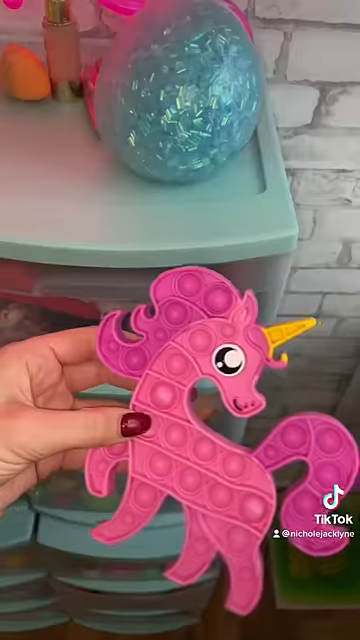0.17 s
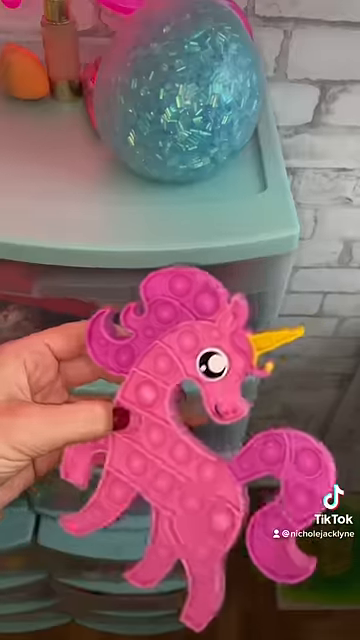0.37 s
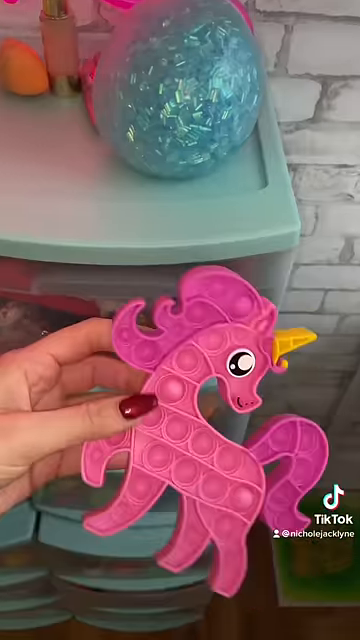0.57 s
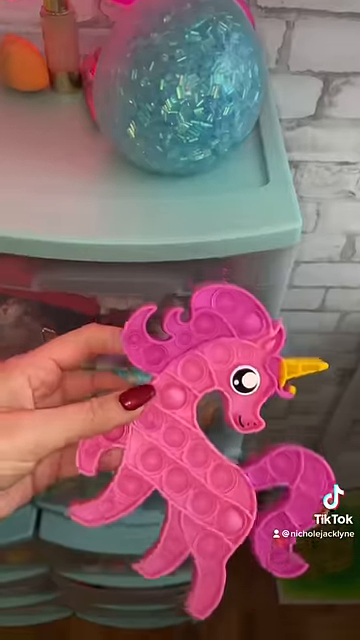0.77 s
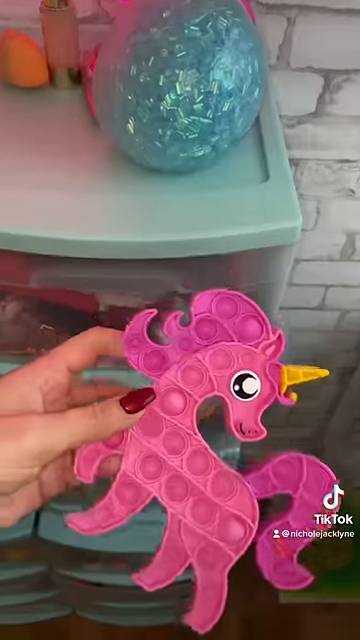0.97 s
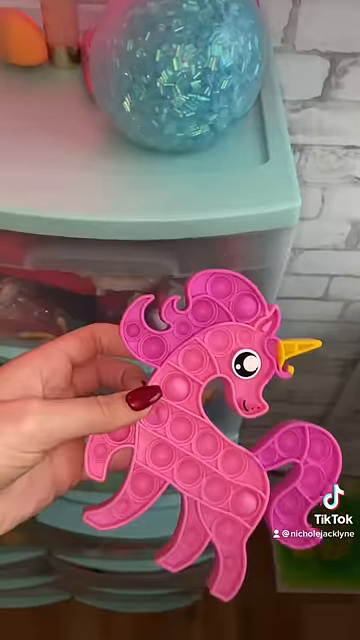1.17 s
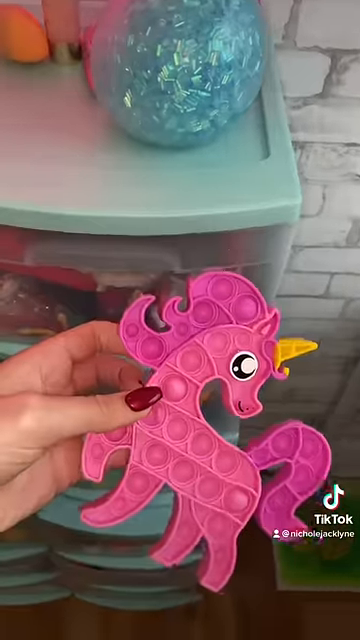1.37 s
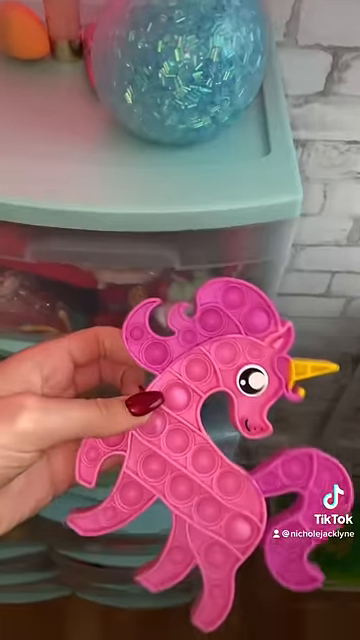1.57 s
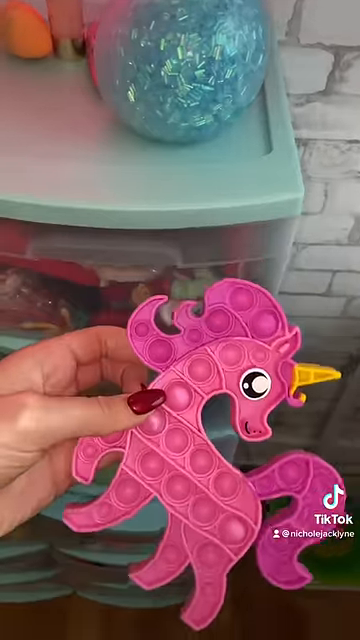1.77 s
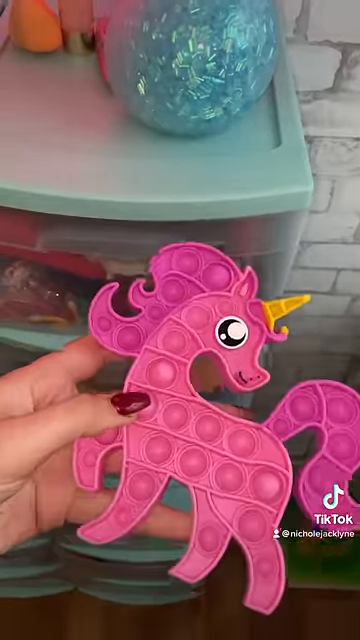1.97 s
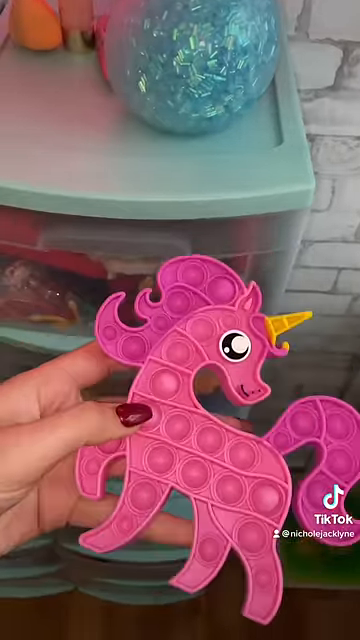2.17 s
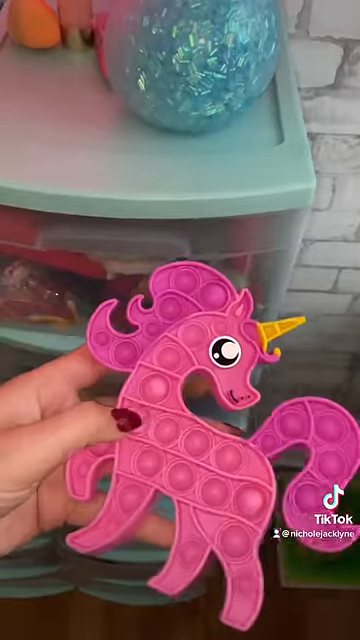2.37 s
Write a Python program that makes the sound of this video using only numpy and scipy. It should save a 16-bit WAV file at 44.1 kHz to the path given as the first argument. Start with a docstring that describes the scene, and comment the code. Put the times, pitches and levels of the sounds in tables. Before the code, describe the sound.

A silicone fidget toy pops three times, first sharply, then more softly, over a low drone.

```python
"""A low drone, then a sharp pop right at the microphone: a hand presses three bubbles of a silicone
fidget toy in a small, live room. Each dome snaps through and rings briefly, the last two more softly.
A brief high hiss swells just before the first two pops; between pops, fingers rub and tick on the rubber.
Farther off, under the room's air and faint hum, is what may be a distant vehicle.
The sound cuts out briefly three times."""
import sys
import numpy as np
from scipy import signal
from scipy.fft import rfft, irfft
from scipy.io import wavfile
from scipy.ndimage import uniform_filter1d

SR = 44100
rng = np.random.default_rng(int(sys.argv[2]) if len(sys.argv) > 2 else 0)


def transcribe(u):
    """Save the signal u as a 16-bit wav file named by the first command-line argument.

    u: samples, shape (n,) or (channels, n), limited to [-1, 1]; the rate is SR.
    q: integer samples, one column per channel.
    """
    v = np.clip(np.atleast_2d(u).T, -1, 1)
    q = np.round(v * 32767).astype(np.int16)
    wavfile.write(sys.argv[1], SR, q)


N = 106060

# pops at the microphone: t/s, gain/dB, pitch ratio, body low-pass/Hz, snap gain/dB,
# back-wave delay/ms, back-wave share, crack level/dB, room send/dB
POPS = [(.2463, -2, 1.05, 3550, 3.5, 1.19, 0.36, -33, -1),
        (1.6544, -13, 1.13, 3260, 3.5, 1.303, 0.64, -52, -1.5),
        (2.2671, -15.5, 1.02, 1760, -4, 1.35, 0.47, -61, 1)]
# modes of a dome, the low ones its body, the high ones its snap: f/Hz, gain/dB, t60/s
DOME_MODES = [(651, -3, 0.0054), (1019, 7, 0.0043), (1691, -17, .008), (2614, -24, 0.0091),
              (3052, -17.5, 0.007), (3350, -30, 0.0041)]
# spectrum of the crack: f/Hz, relative level/dB
CRACK_COLOUR = [(2500, -31), (4300, -18.5), (5300, 2), (6300, 5.5), (7300, -4), (9000, -16), (11500, -15),
                (13500, -34), (16000, -35.5)]
# skin and nail ticking on rubber: t/s, level/dB, centre f/Hz, width/octaves, decay/s
TICKS = [(0.1439, -50, 2700, 0.18, 0.001), (0.433, -63, 7850, 0.27, .003), (.584, -60, 3300, .4, .002),
         (.660, -54.5, 6510, 0.18, 0.0016), (0.6597, -54.5, 1890, 0.42, 0.0026),
         (0.7609, -57.5, 3330, 0.25, 0.0018), (0.76, -52, 1290, 0.31, .002), (1.219, -64, 2990, .7, .002),
         (1.290, -50, 602, 0.15, 0.0061), (1.288, -68, 8620, 0.13, .004),
         (1.351, -54.5, 709.8, 0.33, 0.0056), (1.462, -66, 2500, 1, 0.0013)]
# a brief high hiss just before the first two pops (the 9500 Hz rows), and finger rubs (the rest):
# middle t/s, half length/s, level/dB, centre f/Hz, width/octaves
RUBS_AND_HISS = [(0.06, 0.065, -71, 5560, 0.91), (0.229, 0.042, -65.5, 7500, 0.45),
                 (0.243, 0.01, -56.5, 2360, 1), (0.243, 0.0047, -57.5, 6300, 0.081),
                 (0.242, 0.0019, -58.5, 9500, 0.34), (0.503, 0.051, -76.5, 7740, 0.71),
                 (0.629, 0.037, -70.5, 7750, 0.58), (0.883, 0.032, -69.5, 4800, .8),
                 (1.6525, 0.0022, -58.5, 9500, 0.36), (1.915, 0.027, -73.5, 3200, 0.33),
                 (1.953, 0.023, -71, 7500, .3), (2.2, 0.2, -77.5, 5670, 0.092)]
# decay of the room's tail: f/Hz, t60/s
ROOM_T60 = [(200, 0.73), (600, 0.66), (1200, 0.8356), (2500, 0.54), (5000, 0.98), (12000, 0.1)]
# spectrum at the start of that tail: f/Hz, relative level/dB
ROOM_COLOUR = [(150, 9.5), (450, 3), (800, 2), (1200, -2), (1900, 7), (3000, 1.5), (4000, -3), (6000, 2),
               (12000, -2.5)]
# reflections off nearby surfaces: delay/s, gain/dB
ECHOES = [(.0047, -28), (.0073, -15), (.0096, -20.5)]
# distant vehicle: t/s, engine note f/Hz, note level/dB, roar level/dB, roar centre f/Hz
VEHICLE = [(0, 270, -82, -64.5, 400.2), (.45, 280, -79.5, -74, 330.7), (.56, 292, -63.5, -61, 350),
           (.78, 312, -65, -60, 390), (.95, 325, -64.5, -58.5, 441.7), (1.08, 335, -64.5, -61, 450),
           (1.2, 268, -70.5, -70, 421.4), (1.35, 265, -67.5, -61.5, 380), (1.55, 264, -67.5, -73.5, 327.8),
           (1.93, 266, -68, -63.5, 310), (2.1, 265, -80, -71, 310), (2.4, 265, -76.5, -73, 307.7)]
# swells of the low drone: t/s, level/dB
DRONE_SWELLS = [(0, -49), (.04, -48), (.15, -50), (.3, -59.5), (.39, -62), (.5, -46.5), (.63, -55),
                (.73, -57), (.82, -44.5), (.93, -59), (1.05, -54), (1.22, -56), (1.36, -49), (1.55, -66),
                (1.69, -49), (1.95, -57), (2.18, -59.5), (2.32, -49.5), (2.4, -54.5)]
# still air of the room: f/Hz, relative level/dB
AIR_COLOUR = [(10, -28.5), (22, -16), (40, 1.5), (65, 0), (100, 3), (140, -7.5), (213, -12), (266, -13.5),
              (478, -18.5), (750, -19), (1200, -24.5), (1770, -26.5), (2840, -28), (4550, -32), (5690, -33),
              (8400, -36.5), (12000, -39.5), (15500, -53)]
# tones of the hum and whine: f/Hz, level/dB
HUM_TONES = [(175.8, -70), (425, -71), (8979, -89), (10977, -94), (11972, -94), (12968, -96)]
# brief near-silences: start t/s, end t/s
DROPOUTS = [(.0685, .1378), (1.1015, 1.1897), (1.9683, 2.0607)]

DOME_RISE_S, CRACK_DECAY_S, CRACK_LEAD_S = .001, .0009, .0007
DOME_BOTTOM_HZ, SNAP_FROM_HZ, SNAP_TOP_HZ = 239, 2200, 4050
ROOM_DB, ROOM_DELAY_S = -12, .003
NOTE_WIDTH_HZ, ROAR_WIDTH_HZ, ROAR_TOP_HZ = 14, 280, 641
DRONE_HZ, DRONE_WANDER = 64.8, .021
AIR_DB, AIR_FLICKER_DB = -56.5, 1.7


def pops():
    """Close up, each dome flips with a tiny crack and rings. Gives the direct sound and the room send."""
    near, sent, t = np.zeros(N), np.zeros(N), np.arange(2048) / SR
    rise = 1 - np.exp(-t / DOME_RISE_S)
    for s, db, pitch, top_hz, snap_db, back_ms, back_share, crack_db, send_db in POPS:
        modes = []
        for hz, mode_db, t60 in DOME_MODES:
            envelope = rise * amp(db + mode_db - 60 * t / t60)
            modes.append((hz, envelope * np.sin(2 * np.pi * hz * pitch * t)))
        # a gentler press has a duller body
        body = cut(sum(m for hz, m in modes if hz < SNAP_FROM_HZ), top_hz, "low", order=6)
        snap = cut(sum(m for hz, m in modes if hz >= SNAP_FROM_HZ), SNAP_TOP_HZ, "low", order=8)
        ring = cut(body + amp(snap_db) * snap, DOME_BOTTOM_HZ, "high", order=1)
        burst = noise(lambda f: amp(read(CRACK_COLOUR, f)), len(t))
        crack = amp(crack_db) * np.exp(-t / CRACK_DECAY_S) * burst
        add(near, s - CRACK_LEAD_S, crack)
        add(near, s, ring)
        # the dome's back face sends the opposite wave, which returns off the furniture behind
        add(near, s + back_ms / 1000, -back_share * ring)
        add(sent, s, amp(send_db) * (ring + crack))
    return near, sent


def fingers_and_hiss(grain_db=2.5):
    """Close up, fingers tick and rub on silicone; a high hiss swells just before the first two pops."""
    out, t = np.zeros(N), np.arange(N) / SR
    tick_t = t[:2048]
    for s, db, hz, octaves, decay in TICKS:
        add(out, s, amp(db) * np.exp(-tick_t / decay) * band(hz, octaves, len(tick_t)))
    grain = unit(amp(grain_db * drift(hz=200)))
    for s, half_length, db, hz, octaves in RUBS_AND_HISS:
        swell = amp(db) * np.exp(-.5 * ((t - s) / half_length) ** 2)
        out += swell * grain * band(hz, octaves, N)
    return out


def room(x):
    """The small room answers with near reflections and a diffuse tail whose top treble dies first."""
    hz, t, spectrum = signal.stft(rng.standard_normal(SR), SR, nperseg=256)
    tail_db = read(ROOM_COLOUR, hz)[:, None] - 60 * t / read(ROOM_T60, hz)[:, None]
    tail = signal.istft(spectrum * amp(tail_db), SR, nperseg=256)[1]
    response = np.zeros(SR)
    add(response, ROOM_DELAY_S, amp(ROOM_DB) * tail / np.linalg.norm(tail))
    for s, db in ECHOES:
        add(response, s, amp([db]))
    return signal.fftconvolve(x, response)[:N]


def vehicle():
    """Far off, a muffled engine note and roar climb, drop back and fade."""
    note_hz, note_db, roar_db, roar_hz = curves(VEHICLE)
    roar = cut(noise_around(roar_hz, ROAR_WIDTH_HZ), ROAR_TOP_HZ, "low", order=6)
    note = noise_around(note_hz, NOTE_WIDTH_HZ)
    return amp(note_db) * note + amp(roar_db) * unit(roar)


def drone():
    """Underneath, one low tone swells and sinks, wandering a little in pitch."""
    level_db, = curves(DRONE_SWELLS)
    hz = DRONE_HZ * (1 + DRONE_WANDER * drift(hz=5))
    return amp(level_db) * unit(np.sin(phase(hz)))


def air():
    """Room tone all around the microphone: bass-heavy noise that flickers in small patches."""
    steady = noise(lambda f: amp(read(AIR_COLOUR, f)), N)
    spectrum = signal.stft(steady, SR, nperseg=1024)[2]
    patches = uniform_filter1d(rng.standard_normal(spectrum.shape), size=10, axis=0)  # across frequency
    patches = unit(uniform_filter1d(patches, size=5, axis=1))  # across time
    flickering = signal.istft(spectrum * amp(AIR_FLICKER_DB * patches), SR, nperseg=1024)[1][:N]
    return amp(AIR_DB) * unit(flickering)


def hum(waver_db=2):
    """At the very back, a faint hum and a high, thin whine, each tone wavering in level."""
    out = np.zeros(N)
    for hz, db in HUM_TONES:
        waver = amp(waver_db * drift(hz=5.6))
        out += amp(db) * unit(waver * np.sin(phase(np.full(N, hz))))
    return out


def amp(db):
    """Decibels to gain."""
    return 10 ** (np.asarray(db) / 20)


def unit(x):
    """Scales to rms 1."""
    return x / np.sqrt(np.mean(x ** 2) + 1e-20)


def read(points, hz):
    """Reads a table on a log-frequency axis."""
    f, value = np.transpose(points)
    return np.interp(np.log(hz + 1), np.log(f + 1), value)


def curves(table):
    """Each column after the first, followed through time."""
    s, *columns = np.transpose(table)
    return [np.interp(np.arange(N) / SR, s, c) for c in columns]


def add(mix, s, sound):
    """Mixes a sound in at s seconds."""
    part = mix[max(round(s * SR), 0):][:len(sound)]
    part += sound[:len(part)]


def noise(gain, size):
    """Noise whose spectrum follows gain(Hz)."""
    white = rfft(rng.standard_normal(size))
    return unit(irfft(white * gain(np.fft.rfftfreq(size, 1 / SR)), size))


def band(hz, octaves, size):
    """A bell-shaped band of noise."""
    return noise(lambda f: np.exp(-.5 * (np.log2((f + 1) / hz) / octaves) ** 2), size)


def noise_around(hz, width_hz):
    """A band of noise that follows a pitch curve."""
    return unit(drift(width_hz / 2) * np.cos(phase(hz)) + drift(width_hz / 2) * np.sin(phase(hz)))


def cut(x, hz, kind, order):
    """Low-pass or high-pass filter."""
    return signal.sosfilt(signal.butter(order, hz, kind, fs=SR, output="sos"), x)


def drift(hz):
    """Smooth random motion up to about this rate."""
    return noise(lambda f: np.exp(-.5 * (f / hz) ** 2), N)


def phase(hz):
    """Running phase of a pitch curve, in radians."""
    return 2 * np.pi * np.cumsum(hz) / SR


def scene():
    """One microphone close to the toy, with the room around it and the background behind."""
    near, sent = pops()
    small_sounds = fingers_and_hiss()
    foreground = near + small_sounds + room(sent + small_sounds)
    return (foreground + air() + drone() + hum() + vehicle())[None]


def record(dry, dropout_db=-38.5, top_hz=15400):
    """The sound drops out three times, and the highest treble is cut off."""
    gate = np.ones(N)
    for start, end in DROPOUTS:
        gate[round(start * SR):round(end * SR)] = amp(dropout_db)
    gated = dry * uniform_filter1d(gate, size=24)
    low_pass = signal.firwin(511, top_hz, window=("kaiser", 9), fs=SR)
    return signal.oaconvolve(gated, low_pass[None], "same")


dry = scene()
out = record(dry)
transcribe(out)
```